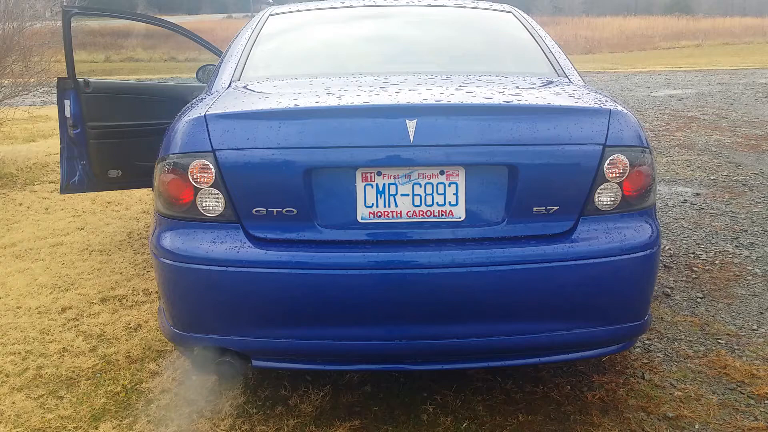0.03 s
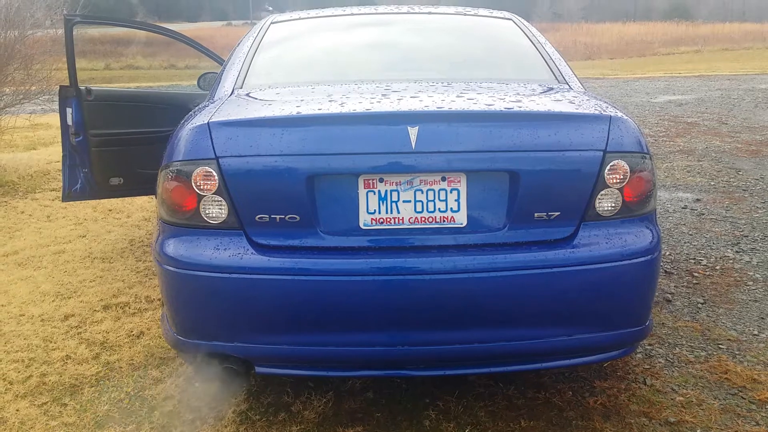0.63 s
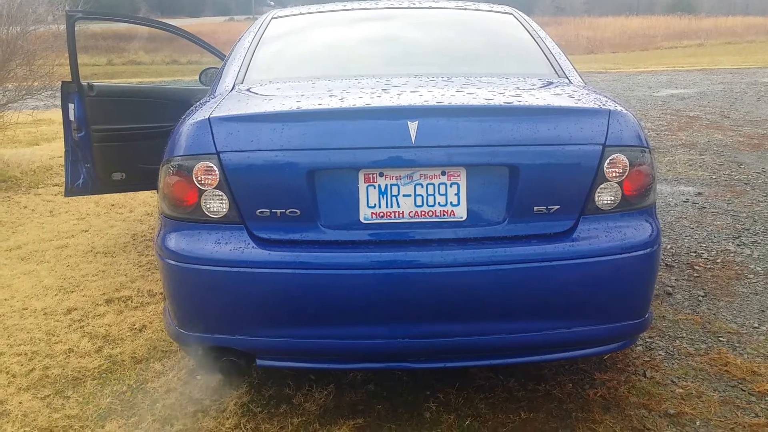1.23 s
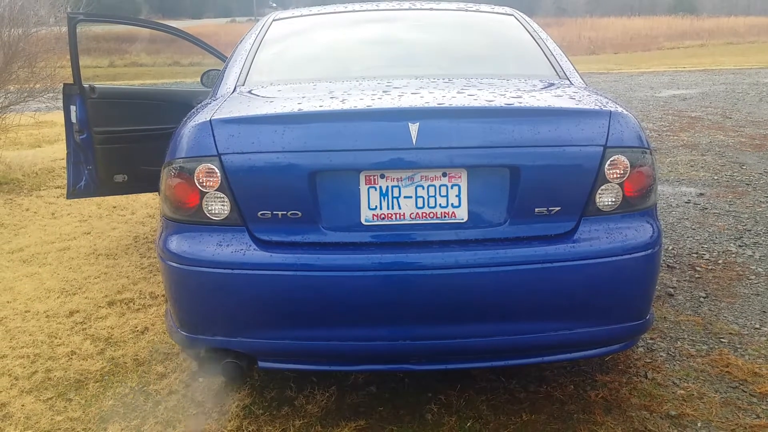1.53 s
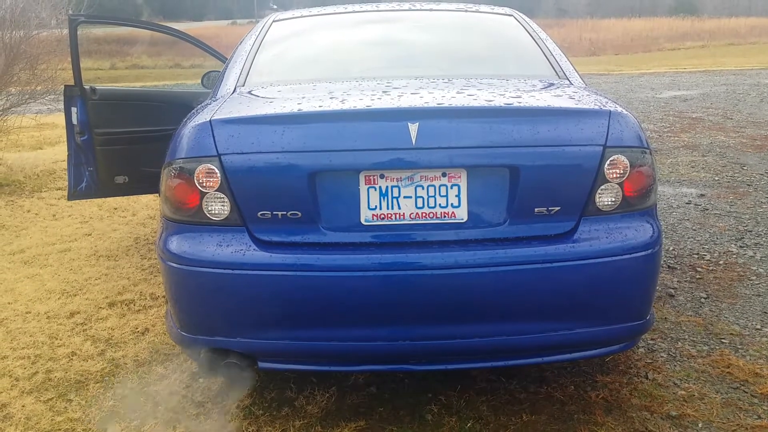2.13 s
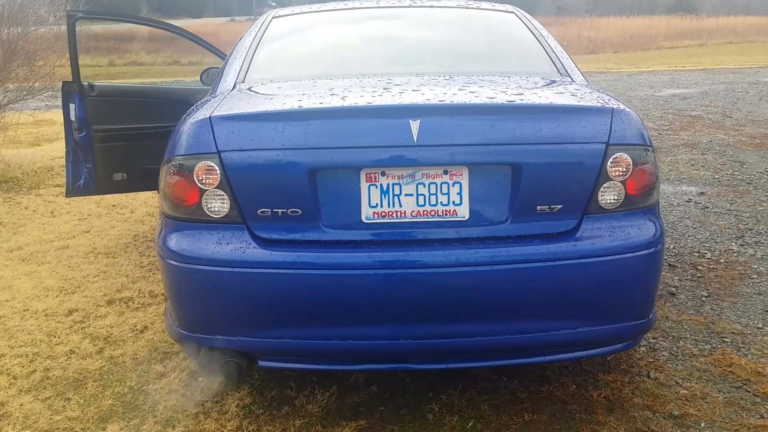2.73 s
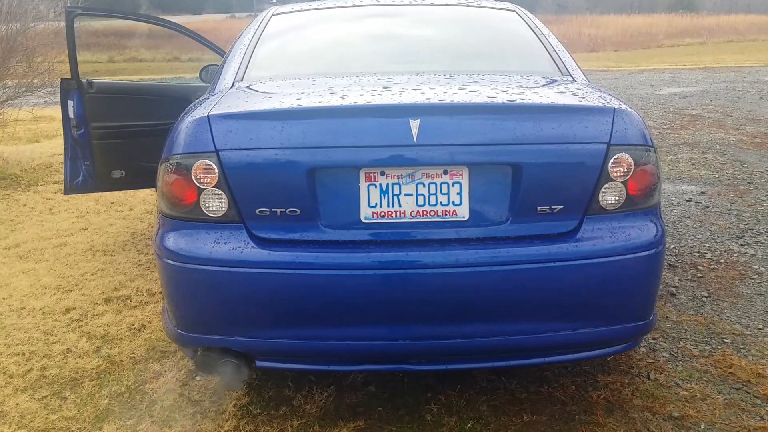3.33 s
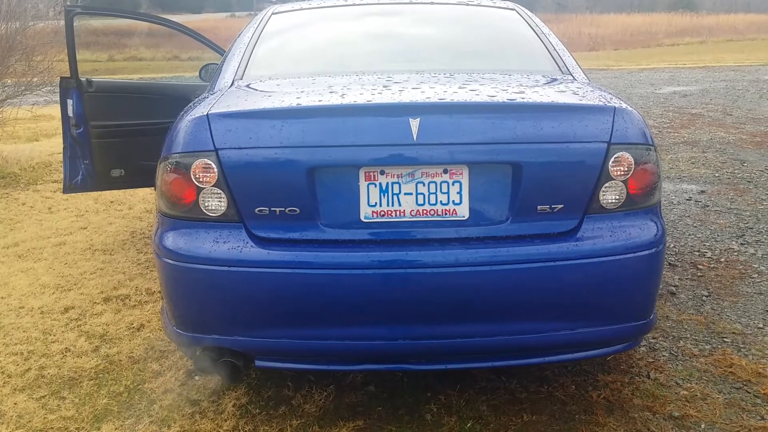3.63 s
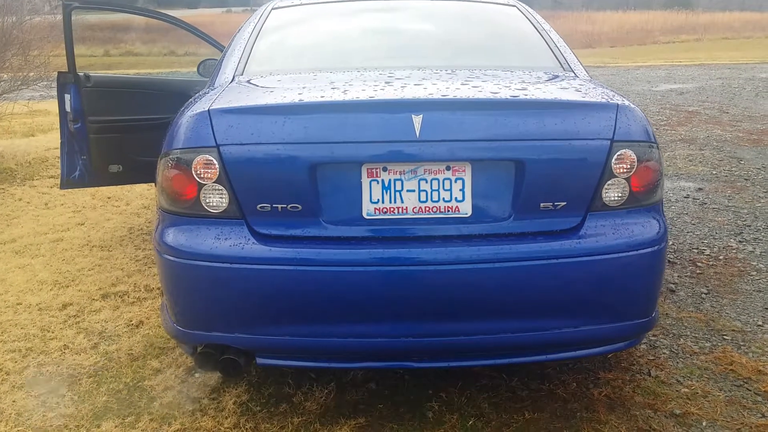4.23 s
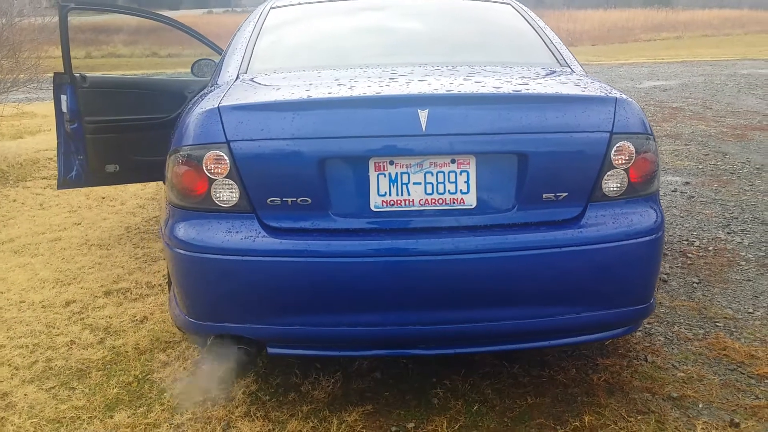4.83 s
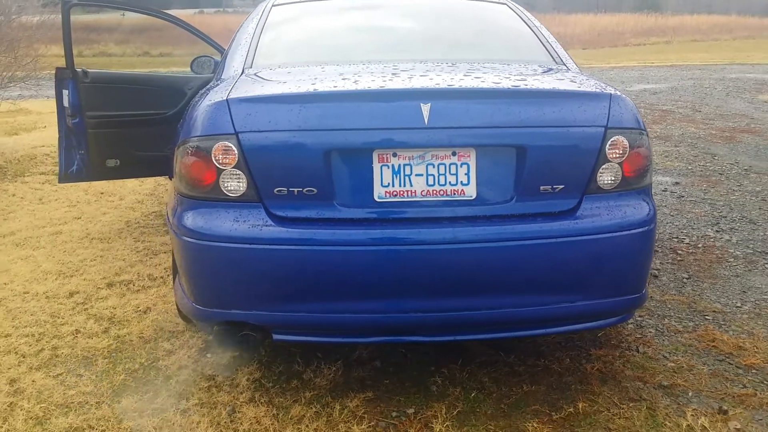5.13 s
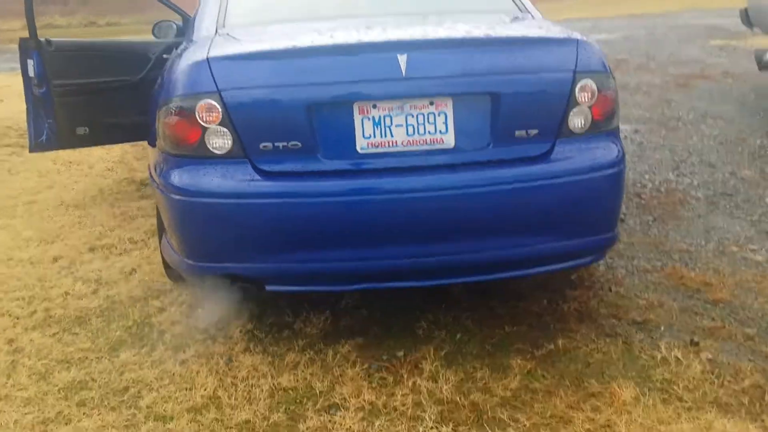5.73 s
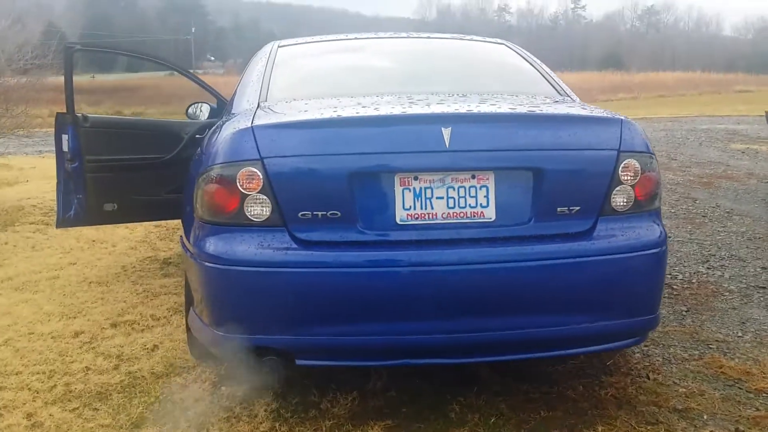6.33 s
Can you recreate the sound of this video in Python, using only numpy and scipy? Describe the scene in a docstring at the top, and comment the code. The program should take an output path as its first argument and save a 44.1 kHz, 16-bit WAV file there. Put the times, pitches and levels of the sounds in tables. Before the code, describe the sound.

Close behind the tailpipe, a car engine idles with an uneven, throbbing rumble and raspy, rhythmic chuffs.

```python
"""Loping V8 idle at the tailpipe

A V8 car idles outdoors, heard from just behind its exhaust. Uneven firings thump through the
pipe's resonances; each also spits a puff of gas, and the puffs swell and sink about four and a half
times a second. Near the end the microphone moves a little, with a light knock, and the tone shifts."""
import sys
import numpy as np
from scipy import signal
from scipy.fft import rfft, irfft, next_fast_len
from scipy.io import wavfile
from scipy.ndimage import uniform_filter1d

SR = 44100
rng = np.random.default_rng(int(sys.argv[2]) if len(sys.argv) > 2 else 0)


def inscribe(sig):
    """Save sig as 16-bit PCM at rate SR to the path in sys.argv[1].

    A 1-D sig is mono; a 2-D sig holds one channel per row.
    Samples are clipped to [-1, 1] before scaling.
    """
    pcm = np.round(np.clip(np.atleast_2d(sig).T, -1, 1) * 32767)
    wavfile.write(sys.argv[1], SR, pcm.astype(np.int16))


N = 289737

# The lope, a round of firings two engine cycles long: strength_db, offset_s, puff_accent_db
LOPE = [(3.5, -0.0067, 0), (-15, -0.005, -1.5), (4, -0.0057, 2.5), (3, 0.0054, -.5), (-1.7, -0.0044, -0.5),
        (-5, -0.0036, 1.5), (6.5, -0.0004, -0.5), (2.5, -0.0026, 0), (4.5, -0.0045, 0), (-5, -0.0029, -.5),
        (0.8, -0.0068, 1.5), (3.5, -0.0051, 1), (3.5, -0.0046, 2.5), (6.5, -0.0063, -1.5),
        (-8.7, -0.001, .5), (2.5, -0.0045, 0.5)]


def firing_times():
    """A cylinder fires each time the crank has turned another quarter."""
    # Idle speed: time_s, firings_per_s
    idle_speed = [(0.58, 70.55), (1.2, 71.92), (1.7, 70.76), (2.05, 71.28), (2.4, 70.77), (2.85, 71.22),
                  (3.4, 70.73), (4.2, 70.41), (5.0, 70.26), (5.7, 70.45), (6.15, 69.17), (6.57, 70.64)]
    t = np.arange(N) / SR
    running = t >= idle_speed[0][0]
    quarter_turns = np.cumsum(curve(idle_speed) * running) / SR
    firings = np.arange(int(quarter_turns[-1]) + 1)
    return t[np.searchsorted(quarter_turns, firings, side="right").clip(0, N - 1)]


def rumble(times, scatter_db=1.5, drift_db=1.83, jitter_s=0.00025, drift_s=0.0005):
    """Strong and weak pressure pulses ring the exhaust; the lope slowly changes its gait."""
    # Weight of the rumble: time_s, level_db
    rumble_level = [(0.6, -14.5), (1.4, -13.8), (2.2, -14.8), (3.8, -14.3), (4.6, -15.5), (5.5, -15.4),
                    (6.5, -13.6)]
    # Tone change at the microphone's second position: frequency_hz, gain_db
    moved_tone = [(120, 2), (200, -1), (295, -2.5), (380, 0), (550, 8)]
    place = np.arange(len(times)) % len(LOPE)
    strength_db, offset_s, _ = np.array(LOPE)[place].T
    timing_noise, level_noise = rng.standard_normal((2, len(times)))
    timing_drift, level_drift = np.sin(times + rng.uniform(0, 2 * np.pi, (2, len(LOPE)))[:, place])
    onsets = times + offset_s + jitter_s * timing_noise + drift_s * timing_drift
    pulse_db = strength_db + scatter_db * level_noise + drift_db * level_drift
    boom = filtered(impulses(onsets, amp(pulse_db)), exhaust_response)
    boom = unit(microphone_move(boom, filtered(boom, lambda hz: amp(along(moved_tone, hz)))))
    # Even out the power over about two rounds, so the gait changes only the beat.
    start = round(times[0] * SR)
    power = np.pad(uniform_filter1d(boom[start:] ** 2, size=20000), (start, 0), mode="edge")
    return amp(curve(rumble_level)) * boom / np.sqrt(np.abs(power) + 1e-9)


def exhaust_response(hz, silencer_hz=(50, 360)):
    """The pipe's resonances, alternating in polarity, sound through the silencer's pass band."""
    # Exhaust resonances: pitch_hz, width_hz, level_db
    pipe_modes = [(52.6, 11.7, -11), (75.6, 12.5, -12), (102.5, 5.07, 7), (130, 27, 0.5),
                  (175.8, 13.2, -8.5), (194.5, 12.5, -2.5), (233.9, 16, -5), (271.1, 15.7, -8),
                  (294.5, 11.6, -2), (363.7, 12.5, -17), (460.9, 11.8, -14)]
    pipe = sum((-1) ** k * amp(db) * 1j * hz * width / (pitch ** 2 - hz ** 2 + 1j * hz * width)
               for k, (pitch, width, db) in enumerate(pipe_modes))
    silencer = signal.butter(3, silencer_hz, "band", analog=True)
    return pipe * signal.freqs(*silencer, hz)[1]


def gas_flow(times, first_lull_s=0.7333, lull_db=11.5, narrowness=3.63, stumble_db=2.5):
    """Gas flow in dB at each firing: it holds near full, then sinks and stumbles once in each surge."""
    # The lulls run a little faster than the lope and slide through it: time_s, lulls_per_s
    lull_rate = [(1.3, 4.427), (2.8, 4.489), (4.2, 4.576), (5.1, 4.769), (6.5, 4.65)]
    # Gas flow between lulls: time_s, level_db
    full_flow = [(0.6, -22.3), (2.0, -21.3), (3.4, -20.6), (4.6, -21.6), (5.3, -23.3), (6.5, -22.7)]
    t = np.arange(N) / SR
    surges = np.cumsum(curve(lull_rate)) / SR
    phase = np.interp(times, t, surges) - np.interp(first_lull_s, t, surges)
    lull = np.abs(np.cos(np.pi * phase)) ** narrowness
    depth_db = lull_db + stumble_db * rng.standard_normal(len(times))
    return np.interp(times, *np.transpose(full_flow)) - depth_db * lull


def gas_puffs(times, scatter_db=1.5, jitter_s=0.00095, held_back_db=3.0):
    """Onset and strength of each firing's puff; a spit replaces the nearest and follows a weakened one."""
    # Hard spits that stand out of the puffing: start_s, strength_db
    spits = [(0.65, -17.5), (0.7186, -17.5), (0.775, -22), (0.875, -16.5), (0.902, -18), (1.0015, -20.5),
             (1.126, -19.5), (1.2808, -16), (1.349, -17.5), (1.503, -17), (1.6011, -19), (1.672, -20.5),
             (1.798, -18), (1.8982, -22), (1.9555, -18.5), (1.9958, -17), (2.0246, -18.5), (2.1224, -19.5),
             (2.1784, -17.5), (2.249, -18.5), (2.3478, -18), (2.4465, -17.5), (2.5755, -19), (2.8, -21),
             (2.8975, -18.5), (3.0227, -19), (3.2058, -19.5), (3.2498, -20.5), (3.3342, -21), (3.4334, -19),
             (3.4765, -20), (3.5734, -16), (3.717, -18.5), (3.8988, -21), (4.127, -23), (4.313, -20),
             (4.4393, -17.5), (4.54, -20.5), (4.6668, -16), (4.767, -23), (4.8246, -20), (4.9952, -18.5),
             (5.0788, -20), (5.2784, -19.5), (5.4246, -21), (5.891, -18), (5.933, -18.5), (6.3504, -18.5),
             (6.4519, -21.5)]
    accent_db = np.array(LOPE)[np.arange(len(times)) % len(LOPE), -1]
    strength_db = gas_flow(times) + accent_db + scatter_db * rng.standard_normal(len(times))
    onsets = times + jitter_s * rng.standard_normal(len(times))
    spit_s, spit_db = np.transpose(spits)
    nearest = np.abs(times - spit_s[:, None]).argmin(axis=1)
    onsets[nearest] = spit_s
    strength_db[nearest - 1] -= held_back_db
    strength_db[nearest] = spit_db
    return onsets, strength_db


def flares(puffs, growth, scatter_db, rise_s, decay_s, tail_db, tail_s):
    """Turbulence flares with each puff and lingers briefly; growth is its dB per dB of puff strength."""
    onsets, strength_db = puffs
    usual_db = np.percentile(strength_db, 75)
    level_db = usual_db + growth * (strength_db - usual_db)
    level_db += scatter_db * rng.standard_normal(len(onsets))
    t = np.arange(SR // 10) / SR
    attack = 1 - np.exp(-(t / rise_s) ** 2)
    release = np.exp(-t / decay_s) + amp(tail_db) * np.exp(-t / tail_s)
    puff_power = (attack * release) ** 2
    puff_power *= np.mean(np.diff(onsets)) * SR / np.sum(puff_power)  # 0 dB puffs average power 1
    power = signal.fftconvolve(impulses(onsets, amp(level_db) ** 2), puff_power)[:N]
    return np.sqrt(np.abs(power)) * turbulence()


def turbulence():
    """Churning gas: left and right white noise, most alike in the bass."""
    # Stereo likeness: frequency_hz, correlation
    likeness = [(500, 0.91), (2500, 0.85), (4000, .68), (8000, 0.22), (12000, 0.18)]

    def spread(hz):
        angle = np.arccos(np.clip(along(likeness, hz), -1, 1)) / 2
        return np.array([np.cos(angle), np.sin(angle)])

    mid, side = filtered(rng.standard_normal((2, N)), spread)
    return np.array([mid + side, mid - side])


def gas_jet(puffs, crack_hz=3100, sizzle_hz=4600):
    """Each puff rasps, cracks and sizzles at the pipe's lip, in a new mix every time."""
    # Jet colour before the microphone moves: frequency_hz, density_db
    jet_before = [(1000, -57), (1700, -35), (1970, -28.5), (2170, -5.5), (2360, 1), (2660, 0.5),
                  (3050, -13.5), (3560, 2), (3890, -3), (4340, -14), (5210, -7), (6730, -11), (9430, -7.5),
                  (12600, -14), (15000, -37)]
    # Jet colour after the move: frequency_hz, density_db
    jet_after = [(1000, -33), (1700, -29), (2210, -15), (2680, -0.5), (2940, 0.5), (3400, -9), (3790, -5.5),
                 (4340, -7), (6260, -15), (7710, -3.5), (9340, -3.5), (13900, -19.5), (15000, -51)]
    rasp = flares(puffs, growth=0.74, scatter_db=2.5,
                  rise_s=0.002, decay_s=0.0019, tail_db=-17.5, tail_s=0.028)
    crack = flares(puffs, growth=1.2, scatter_db=2.5,
                   rise_s=0.0016, decay_s=0.0014, tail_db=-20.5, tail_s=0.024)
    sizzle = flares(puffs, growth=1.01, scatter_db=1.54,
                    rise_s=0.004, decay_s=0.0021, tail_db=-25, tail_s=0.016)
    gas = band(rasp, 1, crack_hz) + band(crack, crack_hz, sizzle_hz) + band(sizzle, sizzle_hz, SR)
    return microphone_move(coloured(gas, jet_before), coloured(gas, jet_after))


def chuff(puffs, throat_hz=(340, 570)):
    """The hollow body of each puff leaving the pipe; it turns throatier at the end."""
    # Chuff colour before the microphone moves: frequency_hz, density_db
    chuff_before = [(200, -24), (370, 4.5), (415, -14.5), (460, -2), (520, -16.5), (570, -13.5),
                    (660, -2.5), (780, -4), (860, 1.5), (1000, -1.5), (1320, 4), (1500, -11.5), (1700, -21),
                    (2100, -28.5)]
    # Chuff colour after the move: frequency_hz, density_db
    chuff_after = [(200, -22), (370, 6.5), (410, -4.5), (460, 6), (540, 1.5), (720, -9.5), (850, 0),
                   (1100, 2), (1350, 3), (1550, -9.5), (2000, -13.5), (2600, -34)]
    # Brief swell of the chuff's low band: time_s, gain_db
    throat_swell = [(5.9, -30), (6.2, -8), (6.4, 0), (6.57, -6)]
    gas = flares(puffs, growth=0.45, scatter_db=1.74,
                 rise_s=0.0018, decay_s=0.0035, tail_db=-13.0, tail_s=0.034)
    before, after = coloured(gas, chuff_before), coloured(gas, chuff_after)
    throat = amp(curve(throat_swell)) * band(after, *throat_hz)
    return microphone_move(before, after) + throat


def microphone_move(before, after):
    """Crossfade two colours: the ground reflection shifts its notches as the microphone moves."""
    # Progress of the move: time_s, share_of_later_colour
    move = [(4.5, 0.14), (5.4, 0.81), (5.9, 0.93)]
    moved = np.clip(curve(move), 0, 1)
    return (1 - moved) * before + moved * after


def knock(decay_s=0.0042):
    """One short, dull push on the camera body."""
    # Handling knock: start_s, level_db
    knocks = [(5.423, -10)]
    start_s, level_db = np.transpose(knocks)
    push = np.exp(-np.arange(SR // 10) / SR / decay_s)
    return signal.fftconvolve(impulses(start_s, amp(level_db)), push)[:N]


def outdoor_air(level_db=-35.5):
    """A faint, wide bed of low outdoor noise."""
    # Colour of the air: frequency_hz, density_db
    air_colour = [(15, -17), (35, -19), (100, -3), (500, -18.5), (1800, -38), (14000, -62)]
    return amp(level_db) * coloured(rng.standard_normal((2, N)), air_colour)


def amp(db):
    """Decibels to gain."""
    return 10 ** (np.asarray(db) / 20)


def unit(x):
    """Scale to rms 1."""
    return x / np.sqrt(np.mean(x ** 2) + 1e-20)


def along(points, hz):
    """Read (frequency_hz, value) points on a log frequency axis."""
    point_hz, values = np.transpose(points)
    return np.interp(np.log(hz + 1), np.log(point_hz + 1), values)


def curve(rows):
    """Turn (time_s, value) rows into one value per sample."""
    return np.interp(np.arange(N) / SR, *np.transpose(rows))


def impulses(times, sizes):
    """One spike of each size at each time."""
    return np.bincount(np.clip(np.round(times * SR).astype(int), 0, N), sizes, N + 1)[:N]


def filtered(x, response):
    """Pass x through a complex frequency response."""
    size = next_fast_len(N + SR // 2)
    return irfft(rfft(x, size) * response(np.fft.rfftfreq(size, 1 / SR)), size)[..., :N]


def coloured(x, spectrum):
    """Give white sound a spectrum and keep its power."""
    return filtered(x, lambda hz: unit(amp(along(spectrum, hz))))


def band(x, low_hz, high_hz):
    """Keep a band; neighbouring bands add up to full power."""
    below = lambda hz, edge: 1 / (1 + (hz / edge) ** 12)
    return filtered(x, lambda hz: np.sqrt(np.abs(below(hz, high_hz) - below(hz, low_hz))))


def scene(chuff_db=-7.5):
    """The exhaust over faint outdoor air; its treble sits mostly on the right."""
    # Stereo placement of the exhaust: frequency_hz, left_minus_right_db
    balance = [(100, -0.5), (300, 0), (560, -2.5), (1300, -3), (2000, -2), (2600, 2), (3400, -6.5),
               (4000, -9), (5200, -13), (6500, 0), (8200, -22.5), (10500, -9), (13000, -23)]

    def pan(hz):
        left_db = along(balance, hz)
        return 2 / (1 + amp([-left_db, left_db]))

    times = firing_times()
    boom = rumble(times)
    puffs = gas_puffs(times)
    exhaust = boom + amp(chuff_db) * chuff(puffs) + gas_jet(puffs)
    return filtered(exhaust, pan) + outdoor_air() + knock()


def record(dry, ceiling=0.88, top_hz=14900):
    """The camera fades in, flattens the rare highest peaks and keeps nothing above its band limit."""
    # Opening fade: time_s, gain_db
    fade_in = [(0.583, -120), (0.587, -29.5), (0.61, -15), (0.7, -9), (0.85, -1)]
    limited = np.clip(dry * amp(curve(fade_in)), -ceiling, ceiling)
    return filtered(limited, lambda hz: 1 / np.sqrt(1 + (hz / top_hz) ** 200))


dry = scene()
out = record(dry)
inscribe(out)
```